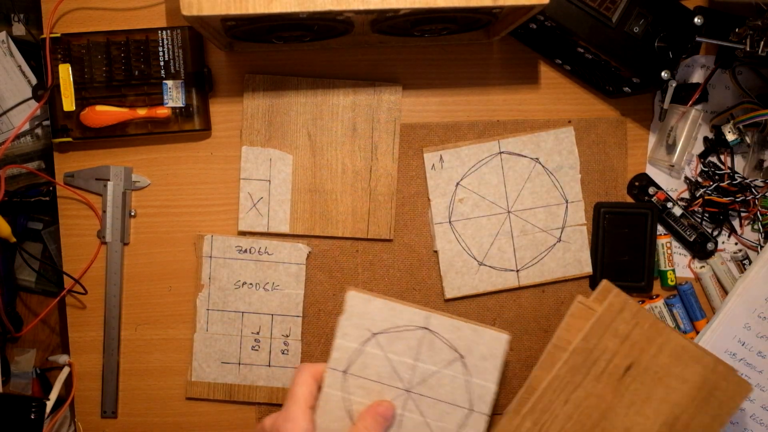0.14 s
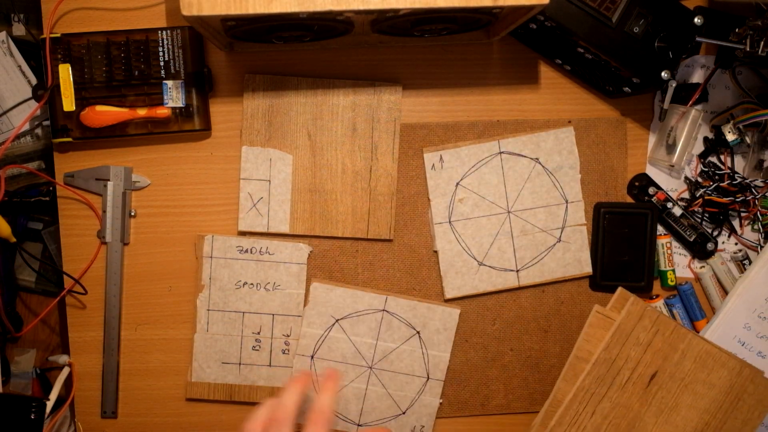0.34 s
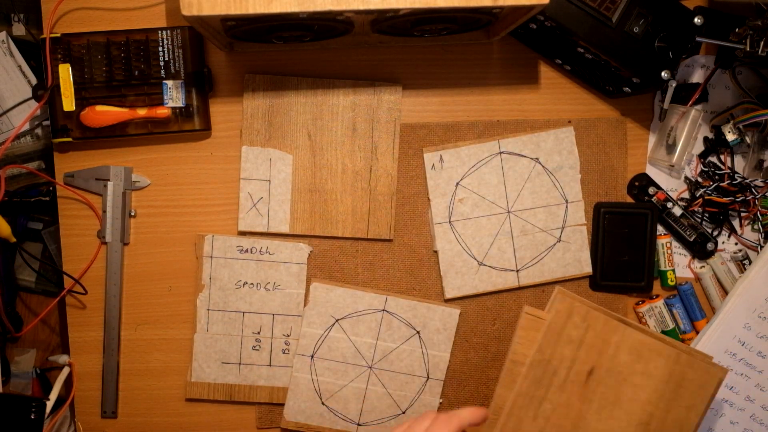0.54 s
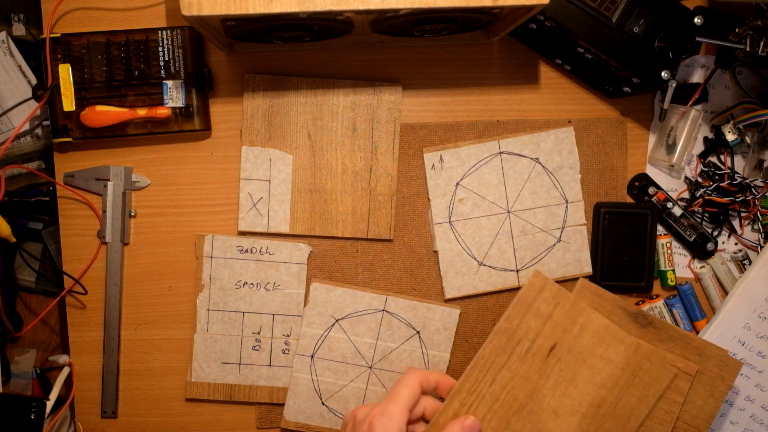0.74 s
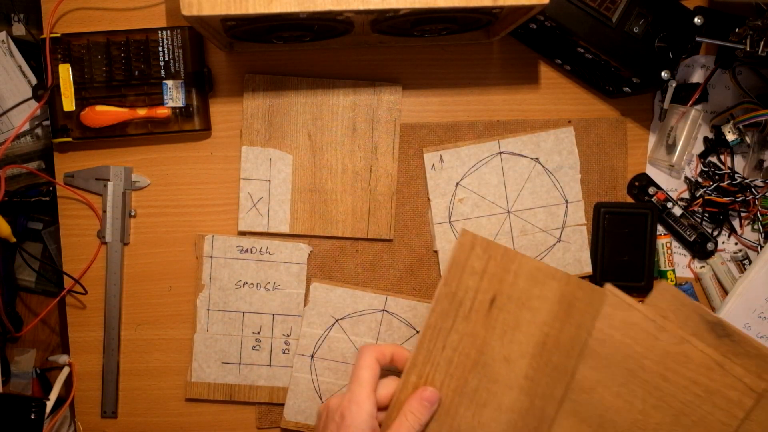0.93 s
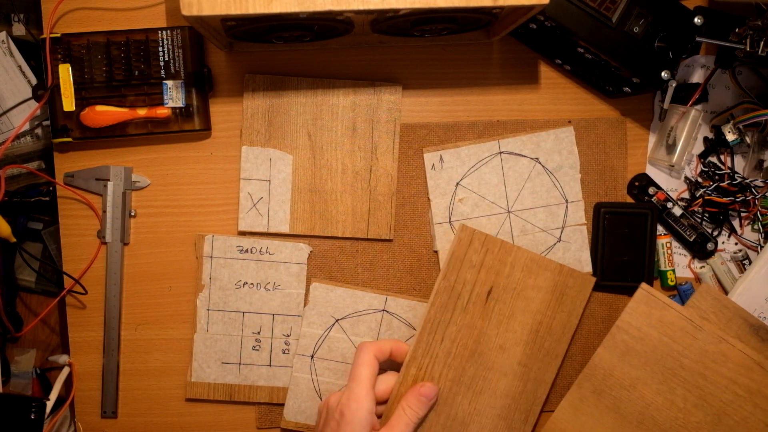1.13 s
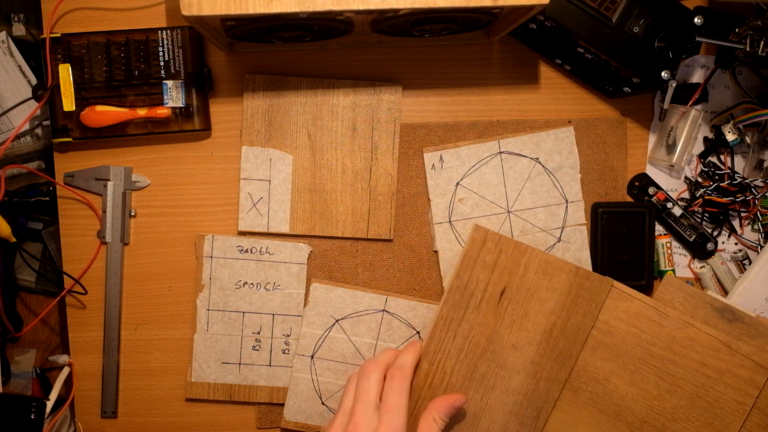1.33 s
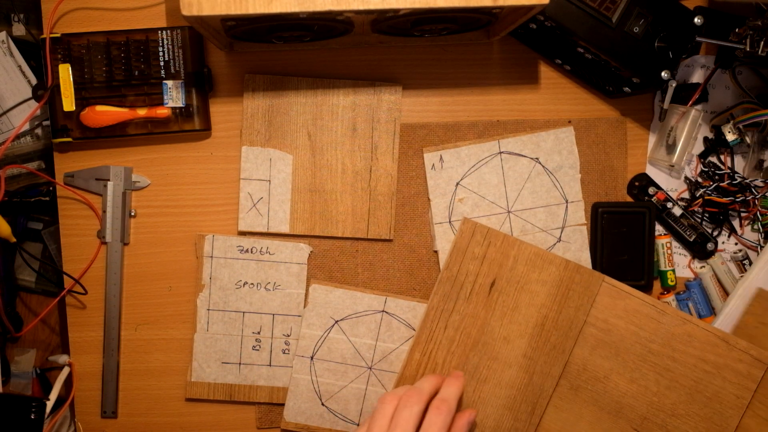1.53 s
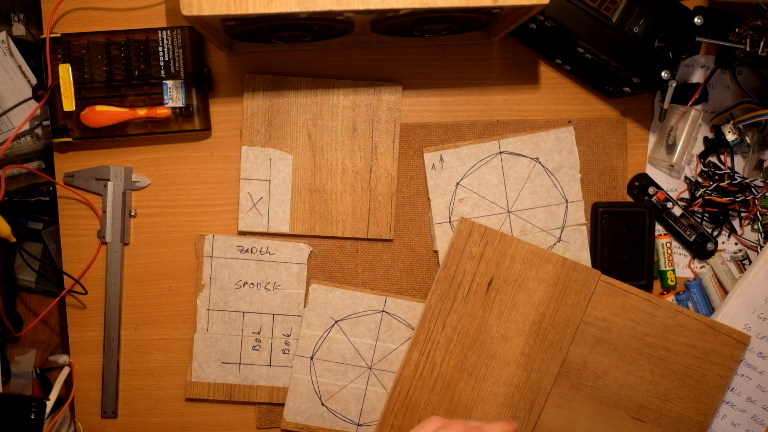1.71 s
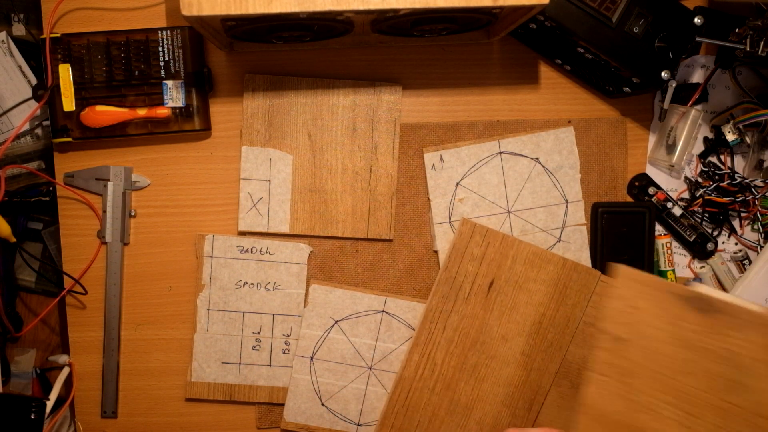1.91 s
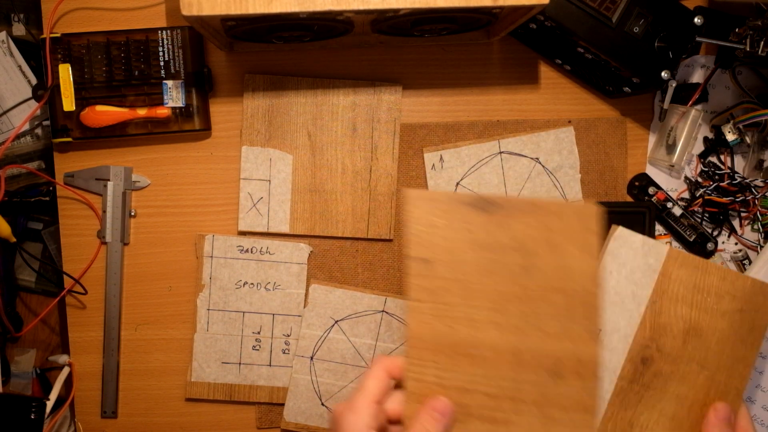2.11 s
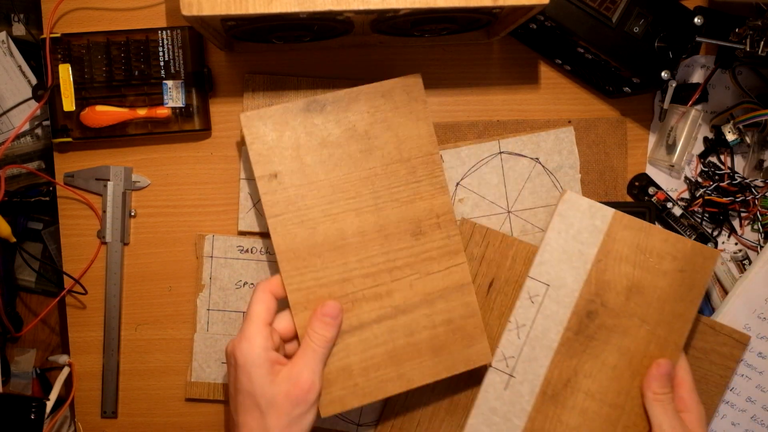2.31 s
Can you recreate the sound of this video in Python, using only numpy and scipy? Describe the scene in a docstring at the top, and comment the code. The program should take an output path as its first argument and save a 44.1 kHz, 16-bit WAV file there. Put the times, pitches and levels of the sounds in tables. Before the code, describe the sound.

Wooden boards on a desk, heard close in a small quiet room. A short scrape leads to a rapid bouncing clatter at 0.2-0.4 seconds. Soft gritty sliding follows from 0.55 to 0.95, with faint taps near 1.0 and 1.2. Sharp knocks rattle at 1.25-1.45, a scrape ends in a hard clack at 1.64, then a brief hissy swish at 2.07 and near silence over faint hum.

```python
"""Wooden boards on a desk

Thin wooden boards are dropped on a desk, bounce, and slide over one another in a small quiet room.
A knock is a crack, a clatter and fading sine waves, over the low boom of the desk top.
A slide is gritty noise, heard as a hiss and through the resonances of a board.
A noise tail adds the room, and shaped noise its quiet hum."""
import sys
import numpy as np
from scipy import signal
from scipy.fft import rfft, irfft, next_fast_len
from scipy.io import wavfile
from scipy.ndimage import map_coordinates

SR = 44100
rng = np.random.default_rng(int(sys.argv[2]) if len(sys.argv) > 2 else 0)


def undo_db(level):
    """Turn decibels back into plain size, where 20 dB means ten times bigger."""
    steps = np.asarray(level, float) / 20
    return 10 ** steps


def wav_record(signal):
    """Record a signal, one row per channel, as 16-bit PCM in the file named by sys.argv[1]."""
    frames = np.transpose(np.atleast_2d(signal))
    bounded = np.clip(frames, -1, 1)
    # unit amplitude maps onto the largest positive 16-bit level
    quanta = np.round(bounded * 32767).astype(np.int16)
    wavfile.write(sys.argv[1], SR, quanta)


N = 103635  # length in samples
HZ = np.fft.rfftfreq(next_fast_len(N + SR), 1 / SR)  # frequencies at which filters are given

# The ways the tile rings. Each row: pitch in Hz, strength in dB, time to fade by 60 dB in seconds.
TILE_MODES = [(845.4, 3, 0.073), (1010, 15, 0.048), (1200, -12, 0.015), (1846, -5.5, 0.03),
              (1850, 2.5, 0.025), (2345, -6, 0.09), (2680, -5, .03), (4600, 4.5, 0.03), (6900, -16.5, .02)]
# Its knocks. Each row: start in seconds, level in dB, favoured pitch in Hz, contact time in ms,
# crack in dB over the level, desk boom in dB over the level.
TILE_KNOCKS = [(.2195, -7, 926, 0.077, 11, -8.5), (.2355, -8.5, 1010, 0.079, -12.5, -10),
               (.2575, -4, 1650, 0.12, -7, -15.5), (.271, -15, 790, 0.19, 4.5, -8),
               (.2945, -8.5, 890, 0.22, 6, -14.5), (.3268, -4, 1852, 0.065, -5.5, -23),
               (.336, -19.5, 776, 0.99, -24, -12.5), (.353, -23.5, 1900, 0.13, -23, -12.5),
               (.364, -23.5, 1850, 0.6, -17, -5)]
# Its slide. Each row: time in seconds, hiss in dB, board ring in dB over the hiss.
TILE_SLIDE = [(0, -37.5, -3.5), (.11, -34, -0.5), (.135, -38.5, 10), (.151, -45, -1), (.157, -54, -0.5),
              (.172, -63.5, 3), (.21, -63.5, 6.5)]


def tile():
    """A small board strikes the desk again and again, and slides: its modes answer both."""
    return knocks(TILE_KNOCKS, TILE_MODES, clatter_db=-26) + slide(TILE_SLIDE, TILE_MODES, judder_db=4)


# The ways the square rings. Each row: pitch in Hz, strength in dB, time to fade by 60 dB in seconds.
SQUARE_MODES = [(437, -4, 0.015), (916, 15, 0.056), (2480, 10.5, 0.018), (2850, 14.5, 0.035),
                (4580, 6.5, 0.045), (6750, 7.5, 0.0086)]
# Its knocks. Each row: start in seconds, level in dB, favoured pitch in Hz, contact time in ms,
# crack in dB over the level, desk boom in dB over the level.
SQUARE_KNOCKS = [(.9885, -34.5, 610, 0.25, 8.5, 2.5), (1.1805, -27.5, 526, 0.24, -4, -17),
                 (1.198, -29, 2480, 0.49, -12, -29)]
# Its slide. Each row: time in seconds, hiss in dB, board ring in dB over the hiss.
SQUARE_SLIDE = [(.52, -77, -1.5), (.55, -48, -2), (.59, -42.5, -35.5), (.63, -44, 1.5),
                (.655, -34.5, -30.5), (.68, -36.5, -16), (.72, -43, -21.5), (.81, -38.5, -6),
                (.885, -41, 3.5), (.905, -40, 5.5), (.935, -38.5, 12), (.942, -58, -2),
                (1.07, -55.5, -18.5), (1.09, -71, -5), (1.17, -58.5, -20.5), (1.183, -46.5, 8),
                (1.3, -54.5, -49)]


def square():
    """A square board is slid and gently knocked, with modes of its own."""
    return knocks(SQUARE_KNOCKS, SQUARE_MODES, clatter_db=-24.5) + slide(SQUARE_SLIDE, SQUARE_MODES, judder_db=5)


# The ways the plank rings. Each row: pitch in Hz, strength in dB, time to fade by 60 dB in seconds.
PLANK_MODES = [(610, 0.5, 0.042), (961, 9.5, 0.097), (1577, 18.5, 0.012), (1850, 9.5, 0.0091),
               (2270, -8, 0.084), (3470, -4, .015), (4400, 3.5, 0.015), (6930, -3.5, .02)]
# Its knocks. Each row: start in seconds, level in dB, favoured pitch in Hz, contact time in ms,
# crack in dB over the level, desk boom in dB over the level.
PLANK_KNOCKS = [(1.239, -7.5, 1600, 0.11, -7.5, -20), (1.2595, -14.5, 2400, 0.078, 5, -12),
                (1.2825, -16, 2140, 0.14, 5.5, -12), (1.3095, -5, 1520, 0.038, -1, -44.5),
                (1.4232, -14, 2520, 0.06, 14, -17.5), (1.4262, -11.5, 1154, 0.11, 0, -13),
                (1.4335, -12, 970, 0.1, -3.5, -18), (1.456, -14.5, 1820, 0.28, -20, -25.5)]


def plank():
    """A plank knocks and bounces: each contact sets its modes ringing."""
    return knocks(PLANK_KNOCKS, PLANK_MODES, clatter_db=-15)


# The ways the panel rings. Each row: pitch in Hz, strength in dB, time to fade by 60 dB in seconds.
PANEL_MODES = [(338, 0.5, 0.033), (519, -1.5, 0.11), (800, 2, 0.1), (1034, 1.5, 0.081), (1466, 0, 0.02),
               (2030, -1, 0.02), (2730, -3, 0.045), (3446, -8, 0.03), (4000, -6, 0.035), (6600, -20, .012)]
# Its knocks. Each row: start in seconds, level in dB, favoured pitch in Hz, contact time in ms,
# crack in dB over the level, desk boom in dB over the level.
PANEL_KNOCKS = [(1.6422, -7, 800, 0.07, 0, -12), (1.6436, -4, 3100, .05, -4, -18),
                (1.693, -19, 400, 0.7, -8, -2), (2.295, -49, 800, 0.42, -6, -15.5)]
# Its first slide. Each row: time in seconds, hiss in dB, board ring in dB over the hiss.
PANEL_SLIDE = [(1.31, -29, -24.5), (1.33, -44, -1), (1.41, -50.5, 7.5), (1.425, -44, 15.5),
               (1.55, -31.5, 2), (1.59, -31.5, 4), (1.608, -55, 17.5), (1.638, -61, 23.5)]
# Its second slide. Each row: time in seconds, hiss in dB, board ring in dB over the hiss.
LIFT_SLIDE = [(1.8, -67.5, 15), (1.9, -60, -2.5), (1.94, -47.5, -3), (1.97, -51.5, -3.5),
              (2.025, -56.5, -2), (2.068, -25.5, -21), (2.105, -42, -17.5), (2.17, -58.5, -25.5),
              (2.24, -90.5, 2), (2.285, -63.5, 1), (2.32, -105.5, 5)]


def panel():
    """A panel with lower modes is slid twice and knocked."""
    slides = slide(PANEL_SLIDE, PANEL_MODES, judder_db=5) + slide(LIFT_SLIDE, PANEL_MODES, judder_db=3)
    return knocks(PANEL_KNOCKS, PANEL_MODES, clatter_db=-16.5) + slides


def knocks(rows, modes, clatter_db):
    """Each contact: crack, clatter and ring, all dulled by a longer contact, then the boom of the desk."""
    ring_db, crack_t60_s, clatter_t60_s, crack_rise_s = 1.5, 0.013, 0.21, 0.00072
    out = np.zeros(N + SR)
    t = np.arange(SR * 3 // 4) / SR
    noise = crack_noise()
    rattle = unit(noise + unit(rubbed(rng.standard_normal(N), modes)))
    for start_s, db, favour_hz, contact_ms, crack_db, boom_db in rows:
        crack = np.roll(noise, rng.integers(N))[:len(t)] * undo_db(crack_db - 60 * t / crack_t60_s)
        clatter = np.roll(rattle, rng.integers(N))[:len(t)] * undo_db(clatter_db - 60 * t / clatter_t60_s)
        rise = 1 - np.exp(-t / crack_rise_s)
        hit = undo_db(ring_db) * ring(modes, favour_hz, t) + (crack + clatter) * rise
        # two equal smoothing steps dull the hit, then its energy is restored
        keep = np.exp(-1000 * np.pi / (SR * max(contact_ms, .02)))
        soft = signal.lfilter([1], [1, -2 * keep, keep ** 2], hit)
        soft *= np.linalg.norm(hit) / np.linalg.norm(soft)
        out[round(start_s * SR):][:len(t)] += undo_db(db) * (soft + undo_db(boom_db) * desk_boom(t))
    return out[:N]


# Tone of the crack. Each row: frequency in Hz, relative level in dB.
CRACK_TONE = [(100, -2), (400, 1), (1500, 2.5), (4000, -9.5), (8000, -20.5), (16000, -36.5)]


def crack_noise():
    """Steady noise with the tone of wood cracking against wood."""
    return unit(filtered(rng.standard_normal(N), undo_db(along(CRACK_TONE, HZ))))


def ring(modes, favour_hz, t):
    """Fading modes, strongest near a favoured pitch, each blurred by a random drift of its phase."""
    favour_oct, scatter_db, blur = 0.49, 2, .025
    hz, db, t60 = np.transpose(modes)[:, :, None]
    octaves_off = np.log2(hz / favour_hz)
    weight = undo_db(db - 8.2 * (octaves_off / favour_oct) ** 2 + rng.normal(0, scatter_db, hz.shape))
    steps = rng.standard_normal((len(hz), len(t)))
    drift = np.sqrt(2 * np.pi * blur * hz / SR) * np.cumsum(steps, axis=1)  # phase in radians
    push = rng.choice([-1, 1], hz.shape)  # each mode starts either way
    waves = weight * push * undo_db(-60 * t / t60) * np.sin(2 * np.pi * hz * t + drift)
    x = waves.sum(axis=0)
    return x / np.abs(x).max()


# The ways the desk rings. Each row: pitch in Hz, strength in dB, time to fade by 60 dB in seconds.
DESK_MODES = [(94, -3.5, 0.25), (125.24, -1.5, 0.7), (159.3, -3.5, 0.32), (232.3, 1, 0.23),
              (310.4, 14, 0.43)]


def desk_boom(t):
    """The desk top's low modes, favoured near 172 Hz, swelling in over a few milliseconds."""
    return (1 - np.exp(-t / 0.0023)) * ring(DESK_MODES, 172.0, t)


# Tone of the rubbing hiss. Each row: frequency in Hz, relative level in dB.
HISS_TONE = [(180, -73), (300, -21.5), (814, -6), (1360, -3), (6520, -0.5), (10200, -3), (16000, -25)]


def slide(rows, modes, judder_db):
    """Rubbing noise with gritty catches and a judder that grows as the board rings."""
    grit_per_s, grit_spread_db, grit_db, judder_per_s = 4000, 3, -7, 110
    time_s, hiss_db, ring_db = np.transpose(rows)
    t = np.arange(N) / SR
    caught = rng.random(N) < grit_per_s / SR
    strength = undo_db(grit_spread_db * np.minimum(rng.exponential(1, N), 4))
    catches = caught * strength * rng.choice([-1, 1], N)
    rub = rng.standard_normal(N) + undo_db(grit_db) * unit(catches)
    ring_db_now = np.interp(t, time_s, ring_db)
    hiss_db_now = np.interp(t, time_s, hiss_db, left=-120, right=-120)
    judder = judder_db / (1 + undo_db(-ring_db_now)) * wander(judder_per_s)
    level = undo_db(hiss_db_now + judder)
    hiss = level * unit(filtered(rub, undo_db(along(HISS_TONE, HZ))))
    return hiss + rubbed(level * undo_db(ring_db_now) * rub, modes)


def rubbed(force, modes):
    """A board under a travelling contact: damped, brighter resonances, each swelling and shifting pitch."""
    tilt, widen, spread, shift = 0.54, 0.32, 0.011, .025
    swell_per_s, swell_db = 35, 4
    out, power = 0, 0
    for k, (centre, db, t60) in enumerate(modes):
        for hz in centre * (1 - shift), centre * (1 + shift):
            width = widen * np.log(1000) / np.pi / t60 + spread * hz  # in Hz
            peak = 1j * HZ * width / (hz * hz - HZ * HZ + 1j * HZ * width)
            body = (-1) ** k * undo_db(db) * (hz / 1000) ** tilt * peak
            out = out + filtered(force * undo_db(swell_db * wander(swell_per_s)), body)
            power = power + np.mean(np.abs(body) ** 2)
    return out / np.sqrt(2 * power)


# How the room fades. Each row: frequency in Hz, time to fade by 60 dB in seconds.
ROOM_FADE = [(100, 0.63), (500, 0.47), (1500, 0.33), (4000, 0.28), (10000, 0.17)]


def room(x):
    """A diffuse tail that dies faster in the treble, drawn anew every quarter second."""
    out, step, delay = np.zeros(N + SR), SR // 4, 130  # in samples
    for start in range(0, N, step):
        hz, t, z = signal.stft(rng.standard_normal(SR * 3 // 4), SR, nperseg=256)
        fade = undo_db(-60 * t / along(ROOM_FADE, hz)[:, None])
        tail = signal.istft(z * fade, SR, nperseg=256)[1]
        wet = signal.fftconvolve(x[start:start + step], tail / np.linalg.norm(tail))
        begin = start + delay
        out[begin:][:len(wet)] += wet[:len(out) - begin]
    return out[:N]


# Tone of the quiet hum. Each row: frequency in Hz, relative level in dB.
HUM_TONE = [(30, -17.5), (50, 11), (68, -9), (140, -5.5), (230, -13.5), (800, -21), (1300, -31.5),
            (2300, -22), (16000, -41.5)]


def hum():
    """The quiet room's steady hum: noise that is strongest in the bass."""
    return undo_db(-59.5) * unit(filtered(rng.standard_normal(N), undo_db(along(HUM_TONE, HZ))))


def unit(x):
    """Scales x to an rms level of 1."""
    return x / np.sqrt(np.mean(x ** 2) + 1e-20)


def along(points, hz):
    """Reads a curve of (Hz, value) points on a log frequency axis."""
    f, v = np.transpose(points)
    return np.interp(np.log(hz + 1), np.log(f + 1), v)


def filtered(x, response):
    """Filters x by a response given on HZ."""
    m = next_fast_len(N + SR)
    return irfft(rfft(x, m) * response, m)[:N]


def wander(rate):
    """A smooth random curve through rate random points a second."""
    return map_coordinates(rng.standard_normal(N // 200), [np.arange(N) * rate / SR])


def scene():
    """The boards through the microphone's low cut, with the room's tail and hum."""
    mic_low_hz, room_db = 57.4, -13.5
    wood = tile() + square() + plank() + panel()
    wood = filtered(wood, (1j * HZ / (mic_low_hz + 1j * HZ)) ** 2)
    return (wood + undo_db(room_db) * room(wood) + hum())[None]


def roll_off(x):
    """The treble ends steeply here."""
    return signal.sosfilt(signal.butter(12, 17010, fs=SR, output="sos"), x)


def record(dry):
    """Soft clipping rounds off the loudest peaks."""
    top = .95  # full scale is 1
    mix = dry / (1 + np.abs(dry / top) ** 4) ** (1 / 4)
    return roll_off(mix)


dry = scene()
out = record(dry)
wav_record(out)
```